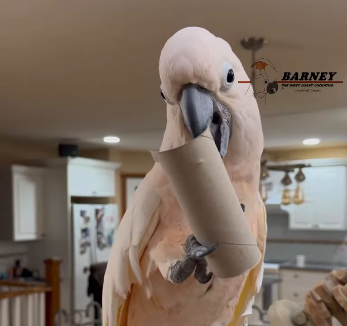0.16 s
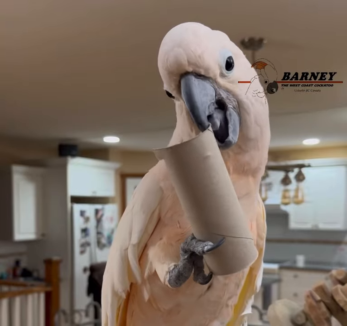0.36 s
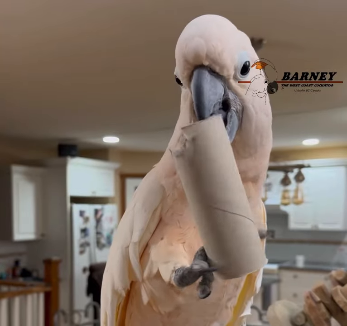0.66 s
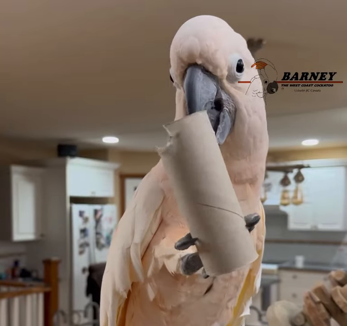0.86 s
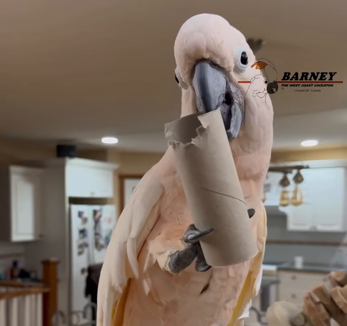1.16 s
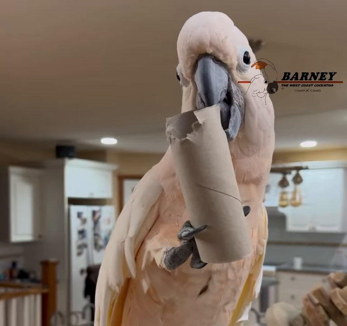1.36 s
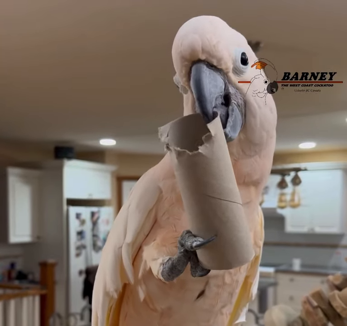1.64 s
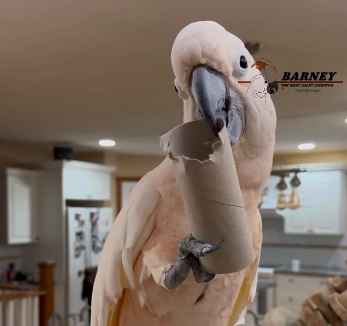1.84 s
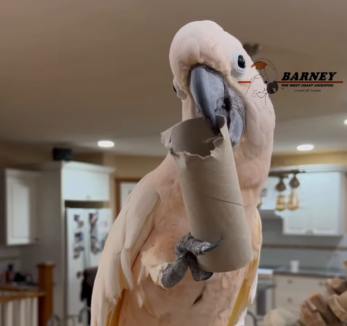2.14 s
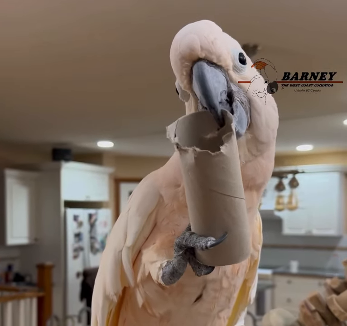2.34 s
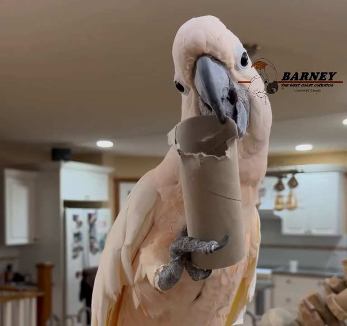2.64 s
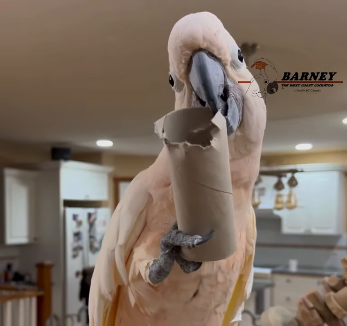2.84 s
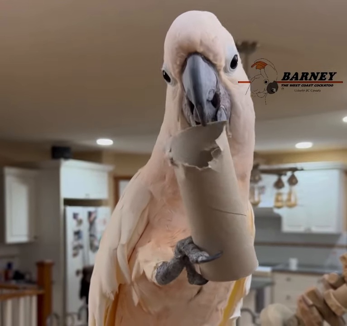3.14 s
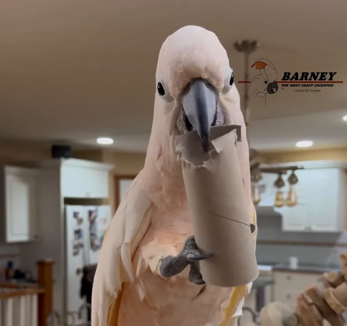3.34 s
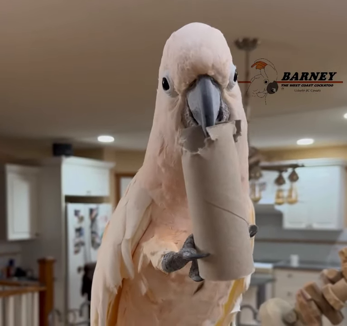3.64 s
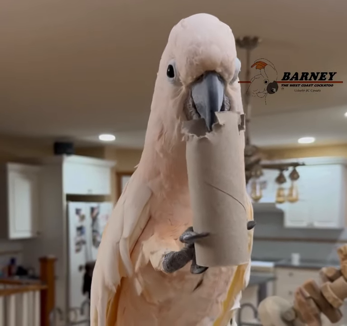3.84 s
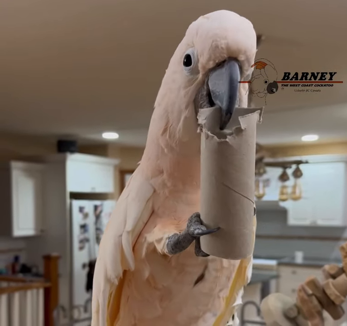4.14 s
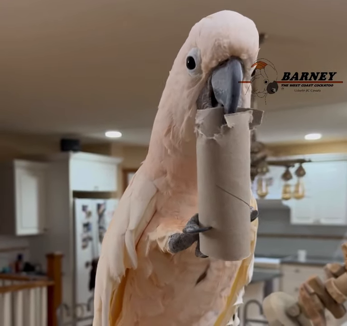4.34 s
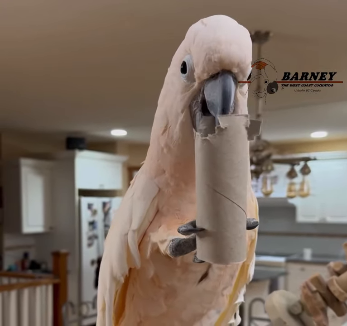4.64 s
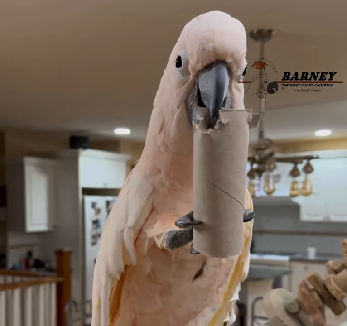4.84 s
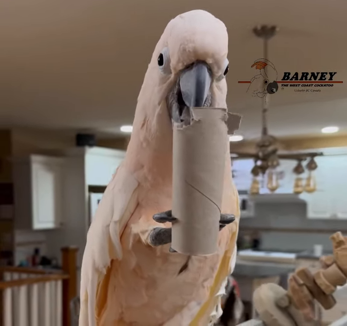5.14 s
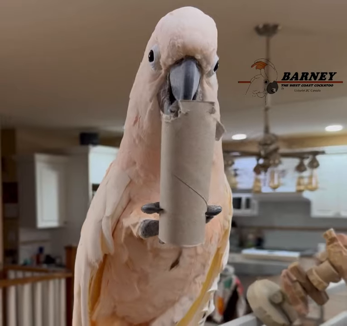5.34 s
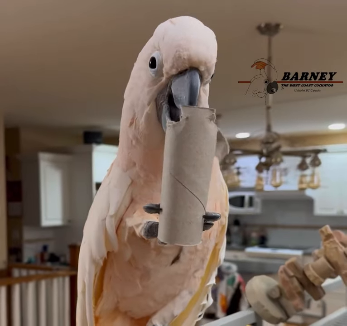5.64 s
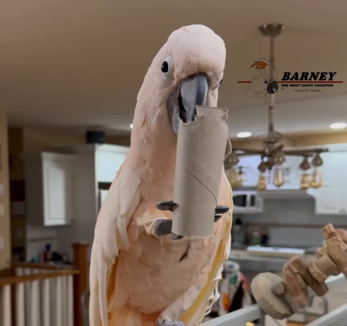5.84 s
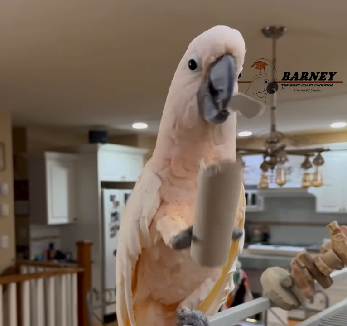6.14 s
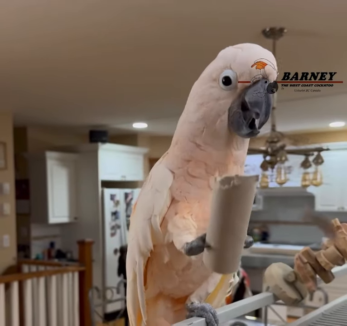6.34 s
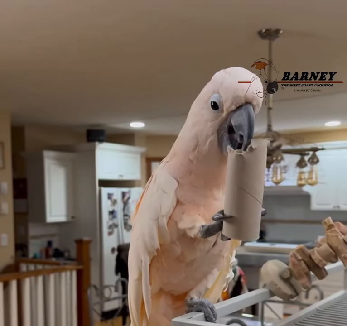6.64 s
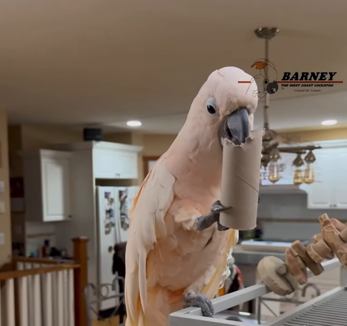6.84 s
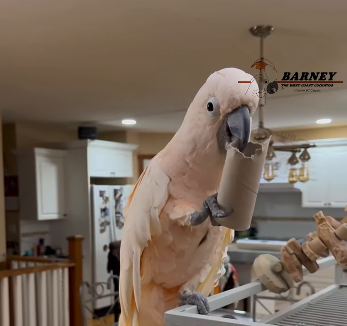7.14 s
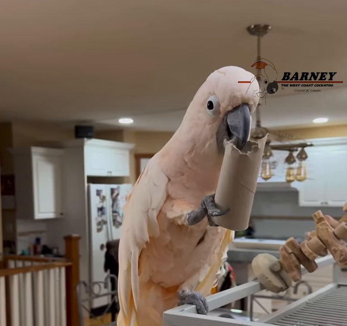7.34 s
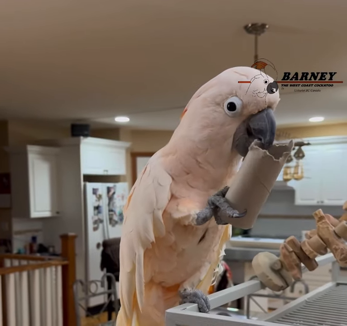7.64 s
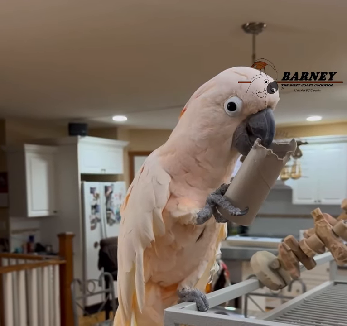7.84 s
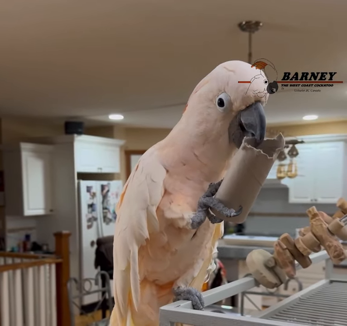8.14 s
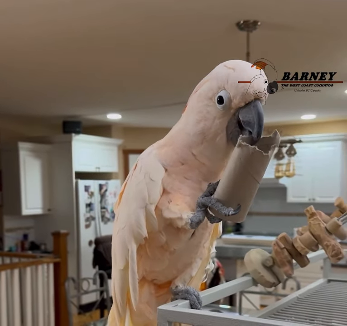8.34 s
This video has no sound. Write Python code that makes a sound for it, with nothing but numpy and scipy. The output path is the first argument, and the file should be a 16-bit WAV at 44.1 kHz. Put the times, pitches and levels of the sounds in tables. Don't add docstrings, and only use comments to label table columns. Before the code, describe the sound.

A parrot tears a cardboard tube with its beak, heard very close in stereo by a phone in a quiet kitchen. From 0 to 1 s, light scrapes, crackle and a cluster of hollow clicks around 0.5 to 0.8. Between 1.1 and 1.7, papery tugs and tiny bright ticks. A hard dry crunch at 1.95 leads into dense fibre snapping and rips until 2.6. At 2.87 comes the loudest snap, a sharp hollow pop with a short pipe-like ring around 1.3 kHz, followed by small fluttering clicks. Sparse taps follow, then strong cracks at 4.24 and 4.7. Quiet scraping and soft plucks fill 5 to 5.9; a crunch lands at 6.0, a crisp snap at 7.0, scratchy rips at 7.3 and 7.9, and crackling tears until 8.5. The hollow pitch rises very slightly. Low, faint fridge and ventilation hum runs throughout, with faint room echo.

```python
import sys
import numpy as np
from scipy import signal
from scipy.fft import rfft, irfft, next_fast_len
from scipy.io import wavfile
from scipy.ndimage import uniform_filter1d, minimum_filter1d

SR = 44100
rng = np.random.default_rng(int(sys.argv[2]) if len(sys.argv) > 2 else 0)


def store_pcm(level_fs):
    pcm = np.round(np.clip(level_fs, -1, 1) * 32767).astype(np.int16)
    wavfile.write(sys.argv[1], SR, np.atleast_2d(pcm).T)


def natural_amplitude(level_db):
    exponent = np.asarray(level_db, float) / 20
    return 10 ** exponent


N = 373968

CRACK_S = 0.0055
SECOND = 2.07

# (frequency [Hz], level [dB])
FIBRE_COLOUR = [(2500, -29), (4500, 1), (6000, 0), (7500, 3.5), (9000, 3.5), (10500, 4), (12500, -8.5),
                (14500, 1), (16000, -1)]
# (frequency [Hz], level [dB])
WALL_COLOUR = [(900, -29.5), (1500, -7), (2000, -3.5), (3000, -3), (4500, -11.5), (5500, -6.5), (8000, -16)]
# (frequency [Hz], level [dB])
KNOCK_COLOUR = [(60, -24), (180, 0.5), (350, -9.5), (650, 0), (1000, -2), (1400, -3.5), (2500, -42)]
# (multiple of the pipe note [-], width [Hz], level [dB])
WALL_OVERTONES = [
    (2.08, 260, -1.5),
    (3.1, 347, -6.5),
    (5.3, 403.4, -8.5),
]


def read(points, hz, axis=1):
    table = np.transpose(points)
    return np.interp(np.log(hz + 1), np.log(table[0] + 1), table[axis])


def evened(x):
    return x / np.sqrt(np.mean(x ** 2) + 1e-20)


def colour(x, points):
    gain = natural_amplitude(read(points, abs(np.fft.fftfreq(8192, 1 / SR))))
    minimum_phase = np.exp(np.conj(signal.hilbert(np.log(gain))))
    taps = np.fft.ifft(minimum_phase).real[:4096]
    return signal.oaconvolve(x, taps[None] / np.linalg.norm(taps), axes=1)[:, :N]


def resonate(x, hz, width):
    turn = np.exp(2j * np.pi * np.cumsum(hz) / SR)
    r = np.exp(-np.pi * width / SR)
    return 2 * (turn * signal.lfilter([1 - r], [1, -r], x / turn)).real


def hum():
    # (frequency [Hz], level [dB per Hz])
    hum_colour = [(25, -24.5), (40, -5), (55, 2.5), (80, 6.5), (150, 1), (250, 5.5), (330, -2), (650, -2),
                  (850, -8), (1400, -17.5), (2500, -23.5), (5000, -30), (9000, -39), (16000, -60)]
    return natural_amplitude(-56) * colour(rng.standard_normal((2, N)), hum_colour)


def kitchen(x):
    # (frequency [Hz], time to fall by 60 dB [s])
    echo = [(250, 0.16), (700, 0.73), (1500, 0.37), (4500, 0.66), (12000, 0.39)]
    taps = np.zeros((2, SR))
    at = np.arange(440, SR - 20, 20)
    at = at + rng.integers(0, 20, (2, len(at)))
    np.put_along_axis(taps, at, rng.choice([-1., 1.], at.shape), 1)
    hz, t, z = signal.stft(taps, SR, nperseg=256)
    decay = natural_amplitude(-60 * t / read(echo, hz)[:, None])
    tail = signal.istft(z * decay, SR, nperseg=256)[1]
    return signal.fftconvolve(x, tail / np.linalg.norm(tail[0]), axes=1)[:, :N]


def crackle(per_s, spread_db, grain_s):
    size = natural_amplitude(spread_db * np.minimum(rng.exponential(1, N), 3.3)) * (rng.random(N) < per_s / SR)
    grains = signal.lfilter([1], [1, -np.exp(-1 / (grain_s * SR))], size)
    return evened(grains * rng.standard_normal((2, N)))


def patchy(x, patch_db):
    z = signal.stft(x, SR, nperseg=256)[2]
    patches = rng.standard_normal(z.shape[:0:-1]).T
    patches = uniform_filter1d(patches, size=3, axis=0)
    patches = evened(uniform_filter1d(patches, size=14, axis=1))
    return signal.istft(z * natural_amplitude(patch_db * patches), SR, nperseg=256)[1][:, :N]


def chewing(column):
    # (time [s], fibre nibbling [dB], air flutter [dB])
    grip = np.transpose([(0.0, -57.5, -67.5), (0.61, -72, -59), (1.28, -73, -91), (1.94, -65, -91),
                         (2.12, -60.5, -69.5), (2.95, -72, -71.5), (3.45, -70.5, -84), (4.27, -65.5, -62),
                         (4.46, -68.5, -65.5), (6.02, -60.5, -64), (6.45, -76.5, -85), (7.41, -63.5, -73),
                         (8.31, -72, -70), (8.48, -60, -66)])
    return np.interp(np.arange(N) / SR, grip[0], grip[column])


def pipe_note():
    # (time [s], pitch [Hz])
    pitch = [
        (0, 1317),
        (3, 1342),
        (6, 1362),
        (8.48, 1382),
    ]
    return np.interp(np.arange(N) / SR, *np.transpose(pitch))


def snaps():
    # (time [s], wall [dB], air ring [dB], dull knock [dB], fibre [dB])
    cracks = [(0.335, -48, -45.5, -61, -63), (0.5764, -51, -48, -57, -57), (.585, -52, -39, -63, -59),
              (.688, -47, -42, -56, -66), (1.945, -32, -69, -40.5, -32), (2.0039, -39, -47, -60, -44),
              (2.6274, -40.5, -48.5, -65, -52), (2.825, -48.5, -61, -72, -48.5),
              (2.8666, -24, -13.5, -40, -42.5), (3.1357, -40, -47.5, -63, -60),
              (3.9897, -44, -48.5, -50.5, -36.5), (4.1922, -45, -59, -57, -39.5),
              (4.2391, -27, -39, -42, -36), (4.7111, -29, -34, -53, -30.5), (6.0146, -39, -35, -46, -43),
              (7.001, -41, -52, -54, -48), (7.0988, -53, -61, -54.5, -44.5), (7.3579, -36, -64, -52.5, -68),
              (7.3752, -35, -66, -48.5, -70), (7.9347, -42.5, -50, -64, -50)]
    # (time [s], fibre [dB], air ring [dB])
    ticks = [(0.1465, -49.5, -54), (1.147, -43.5, -55), (1.2096, -54, -71), (1.338, -56, -68),
             (1.6044, -58, -65), (2.3413, -48, -72), (1.091, -62, -74), (2.5274, -57.5, -57),
             (2.7487, -54, -80), (2.792, -49.5, -68), (3.1133, -58.5, -44), (3.7204, -53.5, -47.5),
             (5.285, -50.5, -70), (5.304, -51, -50), (5.645, -50.5, -55), (5.7254, -57, -70),
             (5.8056, -59, -60), (5.892, -50, -41.5), (7.8062, -51, -68), (7.909, -53.5, -62),
             (7.951, -44.5, -60), (8.0974, -55.5, -47), (8.243, -60, -70), (8.422, -45, -50)]
    # (time [s], wall [dB], air ring [dB])
    taps = [(0.51, -52, -55), (0.7812, -48, -46), (.823, -71, -49), (0.866, -64, -51), (2.8894, -48, -54),
            (3.5084, -63, -59), (3.769, -47.5, -53), (3.799, -53, -58), (4.445, -57, -61),
            (4.4656, -59, -51.5), (6.4797, -50, -73), (6.6658, -53.5, -46), (6.8876, -56.5, -53),
            (7.621, -57, -50), (7.857, -59, -51.5)]
    # (time [s], level [dB])
    flecks = [(0.5526, -39), (0.7198, -47), (0.8589, -47), (1.2072, -39), (1.2521, -43), (1.2795, -38),
              (1.3009, -37), (1.3394, -36), (1.5614, -46), (1.6057, -43), (2.0028, -34), (2.0114, -37),
              (2.0507, -35), (2.0597, -33), (2.176, -44), (2.2862, -44), (2.3161, -41), (2.3391, -36),
              (2.381, -33), (2.3874, -33), (2.3974, -36), (2.595, -46), (2.7771, -41), (3.2675, -48),
              (3.6042, -51), (3.6686, -50), (3.9374, -51), (4.0896, -45), (4.1135, -41), (4.1505, -48),
              (4.1629, -45), (4.2388, -20), (4.3475, -37), (5.1921, -48), (5.2864, -37), (5.6999, -47),
              (5.891, -36), (5.8974, -34), (5.9599, -40), (6.2801, -52), (7.0005, -28), (7.0289, -39),
              (7.2699, -48), (7.2928, -43), (7.3138, -42), (7.3577, -36), (7.3751, -34), (7.8017, -43),
              (7.8615, -46), (7.9129, -36), (7.9314, -33), (8.2856, -44), (8.3255, -43), (8.3908, -39),
              (8.4228, -35)]
    # (time [s], level [dB])
    plucks = [(0.1625, -51), (0.1955, -47), (0.2578, -52), (0.4628, -51), (0.5576, -40), (0.5721, -34),
              (0.618, -44), (0.7044, -43), (0.7297, -38), (0.7387, -37), (0.7876, -42), (0.8584, -48),
              (0.9438, -49), (1.4486, -49), (1.4646, -48), (1.5309, -52), (1.5604, -50), (1.9879, -42),
              (2.1854, -52), (2.3974, -46), (2.5965, -52), (2.6309, -39), (2.8908, -27), (2.9314, -33),
              (2.9634, -37), (2.9861, -39), (3.0086, -41), (3.0214, -41), (3.0594, -51), (3.0909, -46),
              (3.1802, -50), (3.6721, -45), (3.7409, -46), (4.339, -48), (4.9492, -49), (4.9916, -54),
              (5.028, -53), (5.0584, -57), (5.1477, -53), (5.2144, -49), (5.2365, -46), (5.3991, -52),
              (5.4241, -48), (5.453, -46), (5.4735, -44), (5.6067, -52), (5.8984, -42), (5.9144, -46),
              (5.9798, -46), (6.0392, -41), (6.0661, -49), (7.4879, -50), (7.6071, -46), (8.0356, -51),
              (8.0726, -49), (8.329, -49), (8.3569, -52), (8.4572, -50)]
    return ([(*row, CRACK_S) for row in cracks]
            + [(s, db - 4, air, db - 27, db, 0.0067) for s, db, air in ticks]
            + [(s, db, air, db - 9, db - 15.5, 0.005) for s, db, air in taps]
            + [(s, db - 21, -99, -99, db - 9.5, 0.002) for s, db in flecks]
            + [(s, db - 30, db - 5, -99, -99, 0.005) for s, db in plucks])


def swells():
    # (time [s], length [s], fibre [dB], air flutter [dB])
    rips = [(0.538, 0.071, -40, -40), (0.847, 0.034, -50, -62), (0.918, 0.043, -50, -61),
            (1.112, 0.086, -44.5, -52), (1.284, 0.072, -60, -61), (1.525, 0.053, -48, -52),
            (1.963, .031, -66, -69), (2.282, 0.069, -42.5, -78), (2.336, 0.14, -42.5, -57),
            (2.616, 0.03, -36, -48), (2.836, 0.046, -32, -43), (3.658, 0.031, -53, -45),
            (2.917, .05, -62, -46), (2.973, 0.082, -60, -50), (3.918, 0.049, -58, -70),
            (3.972, 0.044, -50, -50), (4.244, 0.034, -58, -48), (4.337, 0.025, -39, -47),
            (4.736, 0.089, -39.5, -64), (5.953, 0.064, -37, -54), (6.254, .06, -52.5, -78.5),
            (6.605, 0.052, -52, -73), (7.031, 0.037, -39.5, -62), (7.302, .032, -56, -53),
            (7.905, 0.043, -40, -57), (8.373, 0.052, -46, -59)]
    # (time [s], length [s], wall [dB], air flutter [dB], dull knock [dB])
    rubs = [(0.187, 0.021, -52, -39, -62), (0.526, 0.064, -37, -56, -42.5), (0.596, 0.044, -48, -42, -56),
            (0.704, 0.056, -45, -42, -64), (0.929, 0.065, -39.5, -54, -45), (1.411, 0.078, -46, -48, -51),
            (1.547, .06, -40.5, -56, -55), (1.641, 0.07, -46.5, -58, -70), (1.999, .033, -32.5, -61, -60),
            (2.1064, 0.034, -39, -46, -65), (2.883, 0.034, -56, -45, -37), (2.163, 0.092, -47.5, -57, -50),
            (2.482, 0.14, -41, -54, -65), (3.263, 0.0174, -39.5, -37.5, -39.5),
            (3.774, .016, -43, -30.5, -56), (5.21, 0.055, -52, -52, -47.5), (5.411, 0.1, -54, -47, -46.5),
            (6.007, 0.041, -39, -41, -62), (7.338, 0.11, -36, -69, -39), (7.567, 0.1, -47, -45.5, -55),
            (8.001, 0.081, -43, -51, -59), (8.267, 0.053, -43, -55, -65), (8.312, 0.044, -51, -54, -65)]
    # (time [s], length [s], fibre [dB], wall [dB], air flutter [dB])
    tugs = [(.001, 0.042, -49, -55, -69), (0.195, 0.21, -51, -46, -58), (0.436, 0.19, -63, -52.5, -56),
            (0.731, 0.31, -52.5, -48, -53.5), (1.147, .27, -43, -48, -66), (1.33, 0.29, -68, -47, -56.5),
            (1.93, 0.12, -63, -71, -75), (2.242, 0.31, -43, -51.5, -63), (2.715, 0.18, -52, -70, -70),
            (2.855, 0.2, -70, -53, -48), (2.872, 0.45, -55, -49, -55), (3.54, 0.25, -55.5, -53.5, -51.5),
            (3.91, 0.41, -48, -59, -81), (4.7, 0.41, -52.5, -50.5, -55), (5.097, 0.35, -50.5, -66, -57),
            (5.632, 0.29, -48.5, -68.5, -69), (5.906, 0.3, -51, -56, -64), (6.581, 0.28, -72.5, -53, -55.5),
            (6.967, 0.28, -48, -44.5, -73), (7.21, 0.23, -43.5, -52, -66), (7.35, 0.28, -83, -44, -53.5),
            (7.815, 0.2, -47, -56, -58), (8.033, 0.14, -53, -43, -47.5), (8.266, 0.26, -39.5, -43.5, -51)]
    return ([(s, db - 3, air, db - 27, db, long) for s, long, db, air in rips]
            + [(s, db, air, knock, db - 7, long) for s, long, db, air, knock in rubs]
            + [(s, wall, air, wall - 12.5, db, long) for s, long, db, wall, air in tugs])


def bursts(column, offset_db, rise, tail, creak, stretch=1):
    t = np.arange(-800, 2000) / SR
    after = np.maximum(t, 0)
    out, shapes = np.zeros(N + 2800), {}
    rows = snaps()
    for length in {row[5] for row in rows}:
        hold = stretch * np.clip(length, .001, .02)
        trail = tail * min(length / CRACK_S, 1) ** 2 * np.exp(-after / 0.032)
        shape = (1 - np.exp(-after / (rise * hold))) * (np.exp(-(after / hold) ** 2) + trail)
        shapes[length] = shape + creak * (hold / 0.0031) ** 2 * np.exp(-abs(t) / 0.0059)
    for row in rows:
        out[round(row[0] * SR):][:2800] += natural_amplitude(row[column] + offset_db) * shapes[row[5]]
    return out[800:N + 800]


def pulls(column, offset_db):
    out = np.zeros(N + SR)
    for row in swells():
        swell = np.hanning(round(np.clip(row[5], .01, .5) * SR))
        out[round(row[0] * SR):][:len(swell)] += natural_amplitude(row[column] + offset_db) * swell
    slips = uniform_filter1d(rng.standard_normal(N), size=400)
    slips = evened(uniform_filter1d(slips, size=300))
    return out[:N] * natural_amplitude(1.2 * slips)


def flaps():
    # (time [s], pitch [Hz], peak [dB], time to fall by 60 dB [s])
    flap_rings = [(2.8668, 6800, -18, .008), (2.8672, 5800, -22, .008), (2.8670, 950, -15, .012),
                  (2.8670, 4500, -21, .008), (2.8670, 2900, -19, .006), (4.2393, 3900, -22, .008),
                  (4.2396, 9300, -24, .008), (4.2393, 10400, -22, .006), (4.2415, 7100, -34, .04),
                  (4.2405, 700, -30, .02), (4.7125, 1620, -29, .02), (4.7125, 6500, -30, .015),
                  (4.7160, 4100, -34, .012), (1.9455, 8800, -30, .008), (1.9470, 7400, -32, .01),
                  (2.0115, 2600, -37, .012), (7.0005, 2500, -32, .005), (6.0155, 2800, -34, .01)]
    t, out = np.arange(2000) / SR, np.zeros(N + 2000)
    for s, hz, db, t60 in flap_rings:
        loudness = natural_amplitude(db - 60 * t / t60) * (1 - np.exp(-t / .0003))
        out[round(s * SR):][:2000] += loudness * np.sin(2 * np.pi * hz * t)
    return out[:N]


def knocks():
    strength = pulls(3, -8.0) + bursts(3, 4.9, 0.074, 0.091, 0.075)
    return colour(crackle(1900, 0.64, 0.0006) * strength, KNOCK_COLOUR)


def wall_scrape(pipe_hz):
    strength = natural_amplitude(chewing(1) - 8.0) + pulls(1, -18.0) + bursts(1, -16.0, 0.2, 0.3, 0.15)
    scrape = crackle(2300, 1.6, 0.0057) * strength
    wall = colour(scrape, WALL_COLOUR)
    for multiple, width_hz, db in WALL_OVERTONES:
        wall = wall + natural_amplitude(db + 3.5) * resonate(scrape, multiple * pipe_hz, width_hz)
    return wall


def fibres():
    strength = natural_amplitude(chewing(1) - 6.5) + pulls(4, -12.0) + bursts(4, -1.72, 0.32, 0.25, 0.059)
    return colour(crackle(2900, 3.3, 0.00066) * strength, FIBRE_COLOUR)


def break_edges(edge, pipe_hz):
    sharp = edge * bursts(1, -1.4, 0.26, 0.016, 0.012, 0.24)
    fibre_edge = colour(edge * bursts(4, 5.7, 0.5, 0.018, 0.011, .4), FIBRE_COLOUR)
    middle = natural_amplitude(11.0) * resonate(sharp, WALL_OVERTONES[1][0] * pipe_hz, 820)
    high = natural_amplitude(3.5) * resonate(sharp, WALL_OVERTONES[2][0] * pipe_hz, 1020)
    push = bursts(3, -13.5, 0.37, 0.011, .01, 0.259) * np.ones((2, 1))
    return fibre_edge + colour(sharp, WALL_COLOUR) + middle + high + colour(push, KNOCK_COLOUR)


def rim(rub, edge, pipe_hz):
    strength = pulls(2, -19.5) + bursts(2, 11.0, .1, 0.008, .02, 0.5)
    flex = resonate(rub * strength, .76 * pipe_hz, 300)
    return flex + resonate(edge * bursts(2, -2.5, .2, .01, .01, 0.58), .74 * pipe_hz, 400)


def air_column(rub, pipe_hz):
    flutter = natural_amplitude(chewing(2) - 3.0) + pulls(2, -8.0)
    note = resonate(resonate(rub, pipe_hz, 200), pipe_hz, 520)
    note = evened(note) * flutter
    overtone = resonate(resonate(rub, SECOND * pipe_hz, 300), SECOND * pipe_hz, 500)
    overtone = evened(overtone) * flutter * natural_amplitude(-24.5)
    turns = 2 * np.pi * np.cumsum(pipe_hz) / SR
    note_ring = np.cos(turns + np.array([[2.2], [0]]))
    overtone_ring = np.cos(SECOND * turns + np.array([[0], [1.3]]))
    note = note + bursts(2, 4.75, 0.13, .012, 0.01, 1.27) * note_ring
    overtone = overtone + bursts(2, -10.0, 0.062, .015, .01, 0.5) * overtone_ring
    return note, overtone


def tube():
    pipe_hz = pipe_note()
    rub = crackle(500, 1.6, 0.002)
    edge = rng.standard_normal((2, N))
    note, overtone = air_column(rub, pipe_hz)
    card = patchy(fibres() + wall_scrape(pipe_hz) + knocks(), 3.5)
    card = card + overtone + break_edges(edge, pipe_hz) + flaps()
    air = note + rim(rub, edge, pipe_hz)
    return card, air * natural_amplitude(np.array([[-8.5], [3.5]]))


def scene():
    card, air = tube()
    echo = kitchen(natural_amplitude(-9) * card + natural_amplitude(-12.5) * air)
    return card + air + echo + hum()


def join_ports(dry):
    # (frequency [Hz], likeness [0-1], lead of the right port [radians])
    ports = [(100, .99, 0), (300, .85, .1), (550, .3, 1.5), (1000, .4, 3), (1900, .3, 6.3), (2600, .3, 9),
             (3900, .3, 6.8), (4650, .35, 8.4), (4900, .76, 9.4), (5150, .45, 10.3), (5500, .4, 11.5),
             (6000, .9, 12.4), (7300, .86, 12.9), (9000, .75, 14), (10300, .8, 14.9), (11300, .9, 15.5),
             (13800, .9, 15.9), (15000, .86, 16.35), (16500, .83, 16.75)]
    size = next_fast_len(N)
    hz = np.fft.rfftfreq(size, 1 / SR)
    left, other = rfft(dry, size)
    same = read(ports, hz)
    shifted = left * np.exp(1j * read(ports, hz, axis=2))
    right = same * shifted + np.sqrt(1 - same ** 2) * other
    return irfft(np.array([left, right]), size)[:, :N]


def limit(pair):
    gain = np.minimum(.58 / (abs(pair).max(0) + 1e-9), 1)
    return pair * uniform_filter1d(minimum_filter1d(gain, size=64), size=64)


def thin_treble(pair, under_db, from_hz, jump_db):
    sides = [pair[0] + pair[1], pair[0] - pair[1]]
    hz, _, z = signal.stft(sides, SR, nperseg=2048, noverlap=1024)
    power = uniform_filter1d(abs(z) ** 2, size=24, axis=1)
    strong = power > natural_amplitude(2 * under_db) * power[::-1]
    keep = (strong | (hz < from_hz)[:, None]) & (hz < 15850)[:, None]
    lean = signal.istft(z * keep, SR, nperseg=2048, noverlap=1024)[1][:, :N]
    full = signal.istft(z * (hz < 16700)[:, None], SR, nperseg=2048, noverlap=1024)[1][:, :N]
    treble = (np.diff(pair, 2, axis=1, prepend=np.zeros((2, 2))) ** 2).sum(0)
    usual = np.roll(uniform_filter1d(treble, size=1024), 600)
    attack = uniform_filter1d(treble, size=128) > natural_amplitude(jump_db) * usual
    attack = uniform_filter1d(1 - minimum_filter1d(1. - attack, size=384), size=128)
    total, difference = lean + .55 * attack * (full - lean)
    return np.array([total + difference, total - difference]) / 2


def low_pass(x):
    return signal.sosfilt(signal.butter(12, 16960, fs=SR, output="sos"), x)


def record(dry):
    pair = limit(join_ports(dry))
    mix = thin_treble(pair, under_db=-7.0, from_hz=3000, jump_db=19)
    return low_pass(mix)


dry = scene()
out = record(dry)
store_pcm(out)
```